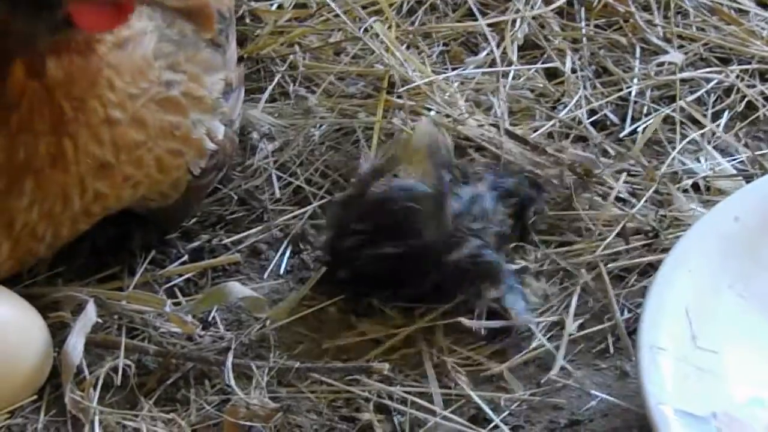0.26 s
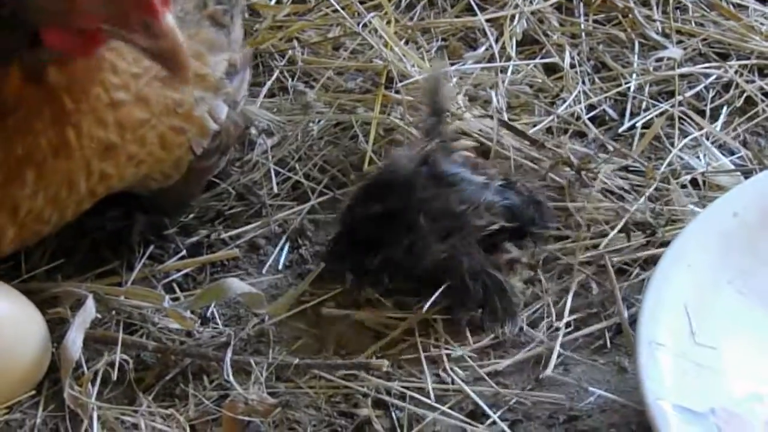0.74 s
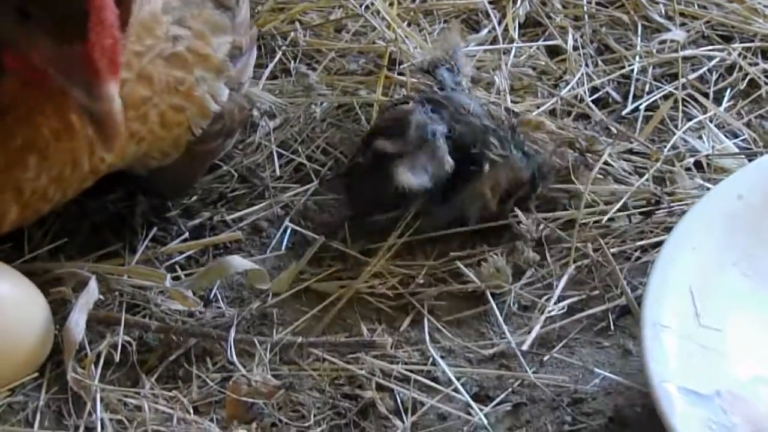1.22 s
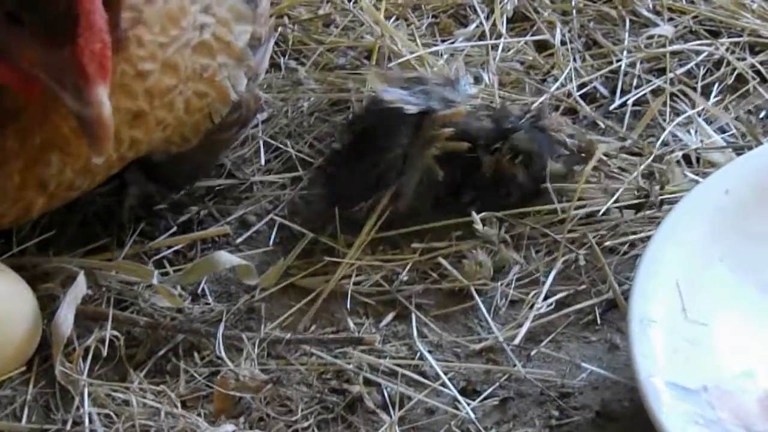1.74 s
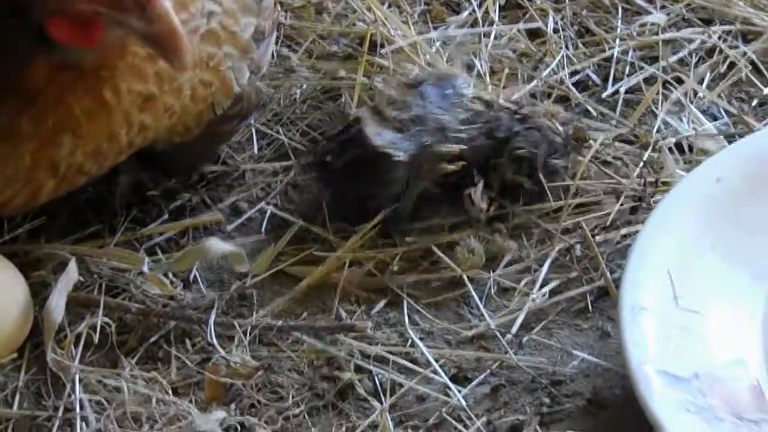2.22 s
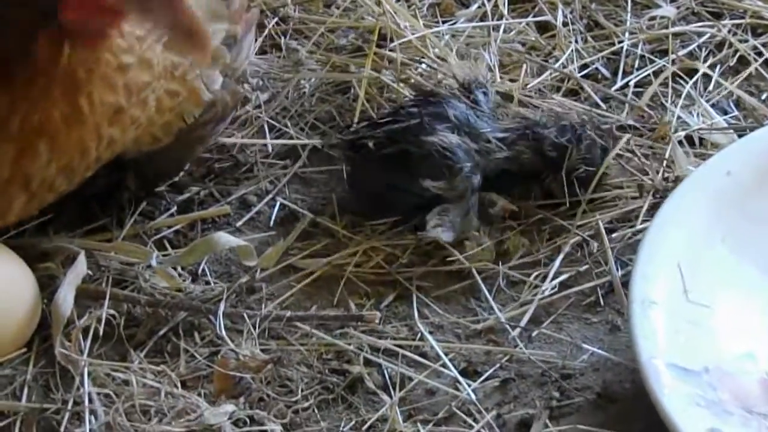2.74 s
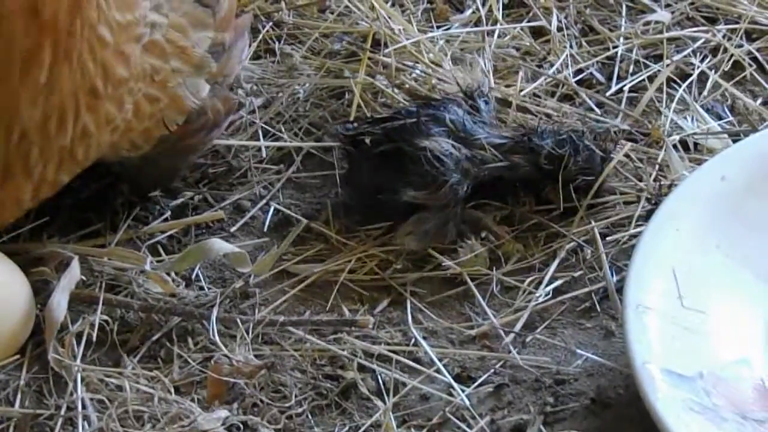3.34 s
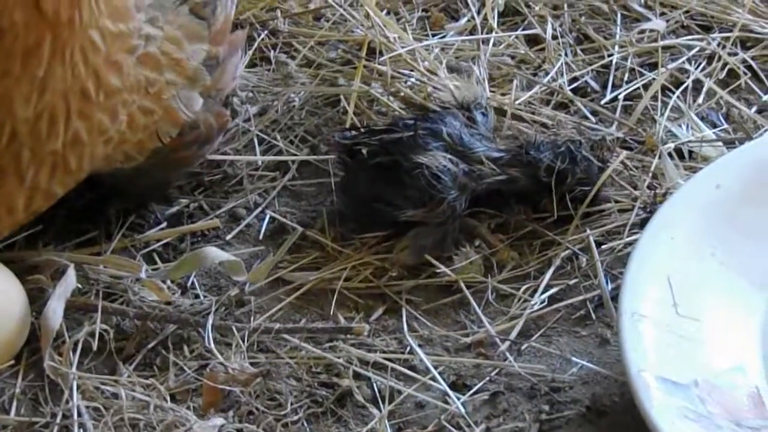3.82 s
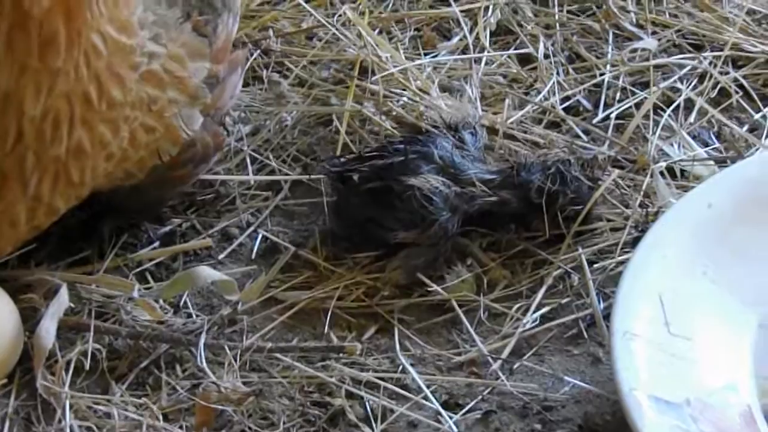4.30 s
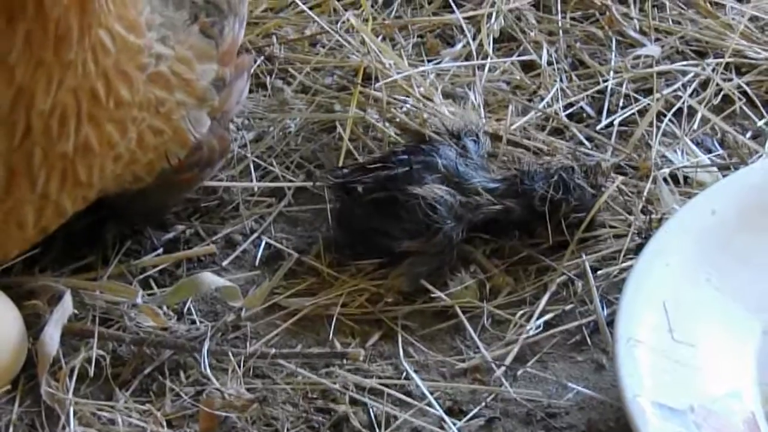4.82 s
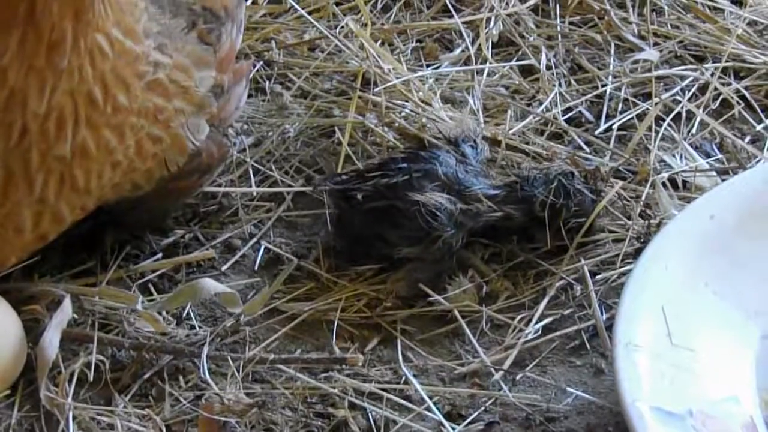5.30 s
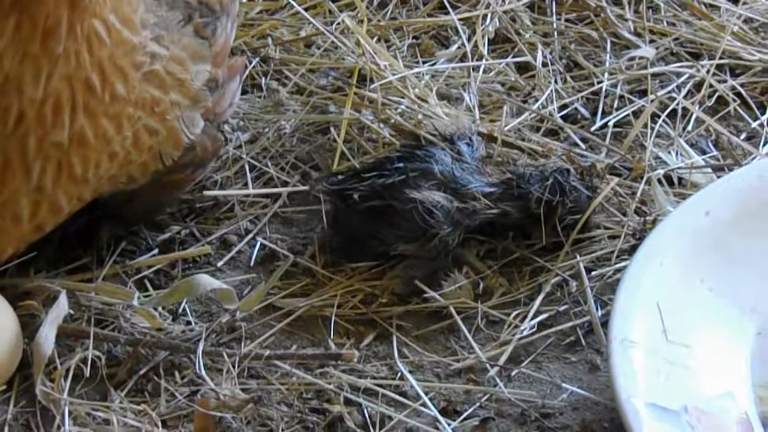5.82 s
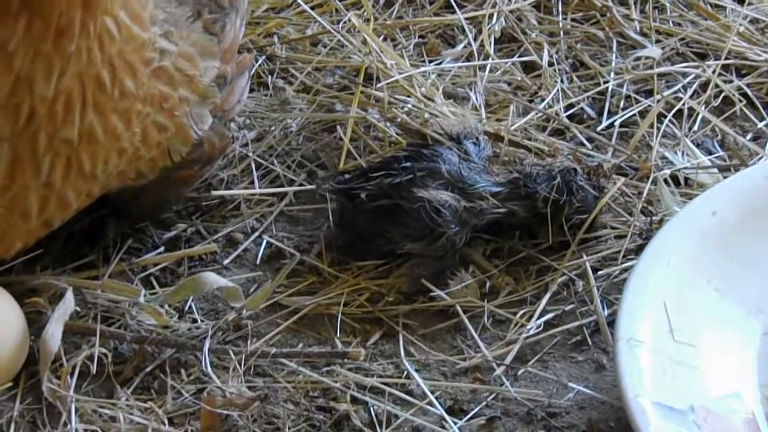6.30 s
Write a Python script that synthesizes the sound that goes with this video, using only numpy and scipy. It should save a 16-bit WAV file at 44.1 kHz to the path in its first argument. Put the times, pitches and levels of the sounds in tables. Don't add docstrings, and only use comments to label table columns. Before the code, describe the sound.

Loud, piercing chick peeps give way to gentler ones over low paired hen clucks, dry straw ticks and soft handling rumble.

```python
import sys
import numpy as np
from scipy import signal
from scipy.fft import rfft, irfft, next_fast_len
from scipy.io import wavfile
from scipy.ndimage import uniform_filter1d

SR = 44100
rng = np.random.default_rng(int(sys.argv[2]) if len(sys.argv) > 2 else 0)


def digitize_waveform(pressure):
    field = np.atleast_2d(pressure).T
    bounded = np.clip(field, -1, 1)
    quanta = np.round(bounded * 32767).astype(np.int16)
    wavfile.write(sys.argv[1], SR, quanta)


def volts_from_decibels(level):
    exponent = np.asarray(level, float) / 20
    return 10 ** exponent


N = 288855


def rms_one(x):
    return x / np.sqrt(np.mean(x ** 2) + 1e-20)


def resonate(x, hz, width_hz):
    r = np.exp(-np.pi * width_hz / SR)
    feedback = [1, -2 * r * np.cos(2 * np.pi * hz / SR), r * r]
    return signal.lfilter([(1 - r * r) / 2, 0, (r * r - 1) / 2], feedback, x)


def resonate_twice(x, hz, width_hz):
    return resonate(resonate(x, hz, width_hz), hz, width_hz)


def slow(size, hz):
    lowpass = signal.butter(2, hz, fs=SR, output="sos")
    return rms_one(signal.sosfilt(lowpass, rng.standard_normal(size + 4000))[4000:])


def coloured(noise, spectrum):
    hz, level_db = np.transpose(spectrum)
    colour = volts_from_decibels(np.interp(np.log(np.fft.rfftfreq(N, 1 / SR) + 1), np.log(hz), level_db))
    return rms_one(irfft(rfft(noise) * colour, N))


def gate(t, start_s, length_s, edge_s):
    return np.clip(np.minimum(t - start_s, start_s + length_s - t) / edge_s, 0, 1)


def add(out, s, sound):
    i = max(int(s * SR), 0)
    out[i:i + len(sound)] += sound[:N - i]


def rumble():
    # frequency in Hz, level in dB per Hz.
    shaking = [(8, -3.5), (18, 2.5), (40, 1), (62, -3.5), (80, -5), (100, -13), (150, -20), (260, -39.5)]
    # time in seconds, level in dB.
    grip = [
        (0, -41.5),
        (1.1, -37.5),
        (1.7, -42.5),
        (2.3, -39),
        (3.67, -40),
        (4.6, -41.5),
        (6.55, -39),
    ]
    t = np.arange(N) / SR
    lumpy = rng.standard_normal(N) * volts_from_decibels(1.0 * slow(N, 8.3))
    return volts_from_decibels(np.interp(t, *np.transpose(grip))) * coloured(lumpy, shaking)


def hiss():
    # frequency in Hz, level in dB per Hz.
    hiss_colour = [(150, -21), (276, -21), (500, -24), (965, -28), (2120, -29), (4000, -28), (4800, -23.5),
                   (5700, -29.5), (14100, -35), (15800, -49)]
    return volts_from_decibels(-47) * coloured(rng.standard_normal(N), hiss_colour)


def murmur():
    # crest in seconds, rise in seconds, fall in seconds, level in dB.
    swells = [
        (1.15, 0.26, .8, -51),
        (2.17, 0.14, .3, -59.5),
        (4.76, 0.29, .7, -46.5),
    ]
    foot_db = -18.5
    t = np.arange(N) / SR
    swell = 0
    for crest, rise, fall, db in swells:
        away = np.where(t < crest, (crest - t) / rise, (t - crest) / fall)
        swell = swell + volts_from_decibels(db + foot_db * away ** 2)
    far = rng.standard_normal(N) * volts_from_decibels(1.2 * slow(N, 10))
    drone = resonate(resonate(far, 375, 50), 375, 150)
    drone += .8 * resonate(resonate(far, 295, 50), 295, 150)
    drone += 0.37 * resonate(resonate(far, 250, 490), 340, 1200)
    return swell * rms_one(drone)


def straw():
    # start in seconds, peak level in dB, centre in Hz.
    ticks = [(.163, -29.5, 3700), (0.167, -28, 3680), (.168, -32, 1900), (.644, -33, 1800),
             (3.978, -33, 3800), (.167, -36, 5800), (0.642, -32, 3600), (0.565, -38, 1800),
             (2.24, -34, 4200), (2.501, -29, 3400), (2.501, -35.5, 4650), (2.98, -36, 9400),
             (3.267, -37, 9500), (3.298, -34, 10000), (3.412, -21, 8500), (3.412, -27, 1030),
             (3.412, -32, 4550), (3.65, -33, 5100), (3.65, -42, 7500), (4.729, -25.5, 970),
             (5.837, -31, 1010), (6.404, -35, 4800), (6.405, -40.5, 1490), (6.458, -33, 4740),
             (6.457, -32, 8500), (6.457, -31.5, 1230)]
    out, t = np.zeros(N), np.arange(400) / SR
    for s, peak_db, hz in ticks:
        burst = rng.standard_normal(400) * np.exp(-t / .001)
        snap = resonate_twice(burst, hz, .45 * hz)
        add(out, s, volts_from_decibels(peak_db) * snap / np.abs(snap).max())
    return out


def coop(x):
    # delay in seconds, level in dB.
    echoes = [(.021, -41), (.051, -42), (.071, -43.5), (.083, -53)]
    # delay in seconds, level in dB.
    boards = [(.0305, -38), (.0332, -31.5), (.0365, -37), (.040, -35.5), (.0445, -36)]
    t60_s, tail_db, dull_hz = 0.56, -35, 6300
    size = next_fast_len(N + SR)
    w = 2 * np.pi * np.arange(size // 2 + 1) / size * SR
    walls = sum(volts_from_decibels(db) * np.exp(-1j * w * lag) for lag, db in echoes)
    for k, lag in enumerate(rng.uniform(0.045, 0.095, 8)):
        loop = volts_from_decibels(-60 * lag / t60_s) * np.exp(-1j * w * lag)
        walls = walls + volts_from_decibels(tail_db) * (-1) ** k * loop / (1 - loop)
    for lag in (.0013, .0029, .0047):
        step = np.exp(-1j * w * lag)
        walls = walls * (step - .6) / (1 - .6 * step)
    walls = walls + sum(volts_from_decibels(db) * np.exp(-1j * w * lag) for lag, db in boards)
    walls = walls / (.75 + .25 * (w / (2 * np.pi * dull_hz)) ** 4)
    return irfft(rfft(x, size) * walls, size)[:N]


def cluck(length, start_hz, end_hz, level_db, overtone_db, envelope, glide, breath_db, flip=0):
    # frequency in Hz, gain in dB.
    throat = [(200, -2), (330, 11.5), (600, 5), (850, -6), (1050, -14.5), (1400, -5), (1900, -7.5),
              (2300, -32), (3000, -11.5), (3700, -17), (4500, -11)]
    chest_hz, chest_width_hz, chest_db = 795, 110, 10.5
    u = np.linspace(0, 1, int(length * SR))
    pitch = (start_hz + (end_hz - start_hz) * glide(u)) * (1 + .04 * slow(len(u), 200))
    pitch = uniform_filter1d(pitch, size=150, mode="nearest")
    phase = 2 * np.pi * (np.cumsum(pitch) / SR + rng.random())

    hz, throat_db = np.transpose(throat)
    flip_db = {1: -4, 2: 13}
    source = 0
    for k in range(1, 13):
        partial_db = np.interp(np.log(k * pitch), np.log(hz), throat_db)
        partial_db = partial_db + (k > 1) * (overtone_db - 1.5 * (k - 4.5))
        partial_db = partial_db + flip * glide(u) ** 2 * flip_db.get(k, 0)
        source = source + volts_from_decibels(partial_db) * np.sin(k * phase)

    puffs = np.maximum(np.cos(phase), 0) ** 2 * rng.standard_normal(len(u))
    breath = sum(volts_from_decibels(db) * resonate_twice(puffs, centre_hz, width_hz) for centre_hz, width_hz, db in
                 [(600, 800, 0), (1550, 900, -11), (3800, 1200, -9), (5800, 1500, -14)])
    source = source + volts_from_decibels(breath_db) * breath
    source = np.pad(envelope(u) * source * volts_from_decibels(2.0 * slow(len(u), 120)), (0, 1500))
    voiced = source + volts_from_decibels(chest_db) * resonate(source, chest_hz, chest_width_hz)
    return volts_from_decibels(level_db) * voiced / np.sqrt(np.max(uniform_filter1d(voiced ** 2, 200)))


def mutters():
    # start in seconds, length in seconds, pitch in Hz, level in dB, overtones in dB.
    low_mutters = [(0.1, 0.0087, 480, -47, -17), (0.314, .037, 553, -48, -21),
                   (0.656, 0.021, 468, -29, -13), (1.235, 0.0055, 460, -40.5, 5),
                   (1.275, 0.01, 384, -38, 0), (1.684, 0.0049, 590, -42, -25),
                   (1.717, 0.017, 674, -38.5, -15), (2.23, 0.025, 682, -41.5, -22),
                   (2.295, 0.011, 673, -34, -25), (2.324, 0.072, 574, -46, -22),
                   (2.724, 0.024, 630, -39, -8), (3.207, 0.027, 660, -36, -18), (3.413, 0.049, 750, -39, 7),
                   (3.762, 0.022, 630, -35, -19), (3.796, 0.083, 562, -47.5, 4),
                   (4.193, 0.036, 517, -44.5, 3), (4.416, 0.0074, 720, -48, -5),
                   (4.435, 0.025, 657, -34, -22), (5.122, 0.018, 730, -33, -14),
                   (6.006, 0.04, 566, -44, -21)]
    out = np.zeros(N)
    opening = lambda u: np.sin(np.pi * u ** 0.65)
    for s, length, hz, *voice in low_mutters:
        add(out, s, cluck(length, hz, 0.871 * hz, *voice, opening, lambda u: u, breath_db=14))
    return out


def warble():
    # time in seconds, pitch in Hz, level in dB, overtones in dB.
    path = [
        (5.808, 770, -30, 12),
        (5.812, 760, -16, 12),
        (5.819, 770, -15, 12),
        (5.824, 940, -2, -14),
        (5.831, 950, -2, -14),
        (5.835, 760, -9, 6),
        (5.839, 520, -7, 6),
        (5.843, 420, -30, 2),
    ]
    s, hz, db, overtone_db = np.transpose(path)
    length = s[-1] - s[0]
    along = lambda column: lambda u: np.interp(u, (s - s[0]) / length, column)
    out, u = np.zeros(N), np.linspace(0, 1, int(length * SR))
    add(out, s[0], cluck(length, 0, 1, -38.5, along(overtone_db)(u), along(volts_from_decibels(db)), along(hz), breath_db=0))
    return out


def coos():
    # start in seconds, length in seconds, end pitch in Hz, level in dB, overtones in dB.
    rising_coos = [
        (0.583, 0.0096, 770, -39.5, 6),
        (1.485, 0.048, 933, -30, -9.5),
        (1.796, 0.03, 888, -27.5, -16),
        (2.0755, 0.039, 850, -25, -20),
        (2.448, 0.038, 872, -25.5, -18),
    ]
    # start in seconds, length in seconds, end pitch in Hz, level in dB, overtones in dB.
    deep_coos = [
        (2.858, 0.036, 898, -26, -5),
        (3.927, 0.037, 840, -29.5, -5),
        (4.679, 0.0327, 796, -30, -4),
        (6.531, .03, 851, -36, -2),
    ]
    # start in seconds, length in seconds, end pitch in Hz, level in dB, overtones in dB.
    long_coo = [
        (1.041, 0.042, 884, -34.5, -2),
    ]
    coo_glide = [(0, 0.012), (.2, .34), (.66, .47), (.8, .9), (1, 0.86)]
    out = np.zeros(N)
    stepped = lambda u: np.interp(u, *np.transpose(coo_glide))
    held = lambda u: np.sin(np.pi * u ** 0.63) ** 0.81
    for s, length, hz, *voice in rising_coos:
        add(out, s, cluck(length, 350, hz, *voice, held, stepped, breath_db=6, flip=.6))
    for s, length, hz, *voice in deep_coos:
        add(out, s, cluck(length, 310, hz, *voice, held, stepped, breath_db=8, flip=1))

    sustained = lambda u: np.minimum(u / 0.03, 1) * (0.62 + 0.2 * np.exp(-u / 0.12))
    levelling = lambda u: np.minimum(u / 0.49, 1) ** 1.52
    for s, length, hz, *voice in long_coo:
        add(out, s, cluck(length, 500, hz, *voice, sustained, levelling, breath_db=-2))
    return out


def pops():
    # start in seconds, length in seconds, start pitch in Hz, level in dB, overtones in dB.
    falling_pops = [(0.159, 0.012, 686, -23.5, -3.5), (0.191, 0.0094, 670, -33, -2.5),
                    (0.631, 0.018, 730, -24, -3.5), (1.076, 0.025, 921, -26, -2.5),
                    (1.525, 0.02, 921, -24, -6), (1.835, 0.013, 785, -22.5, -7),
                    (2.12, 0.012, 765, -21.5, -9), (2.492, 0.012, 750, -21.5, -6),
                    (2.903, 0.0193, 570, -20, 1.5), (3.441, 0.011, 765, -27, 1),
                    (3.97, 0.013, 680, -26.5, -1.5), (4.722, 0.013, 512, -27.5, -0.5)]
    out = np.zeros(N)
    swelling = lambda u: np.sin(np.pi * u ** 1.05) ** 1.07
    falling = lambda u: np.minimum(u / 0.852, 1) ** 0.863
    for s, length, hz, *voice in falling_pops:
        add(out, s, cluck(length, hz, 432.4 - 0.183 * hz, *voice, swelling, falling, breath_db=5))
    return out


def hen():
    return mutters() + warble() + coos() + pops()


def peep(rows, round_s, halo_db, top_db=-24.0):
    # start in seconds, length in seconds, rasp in dB, drop of the whistle in dB.
    catches = [(0.325, 0.0051, -48, -1), (0.336, 0.0065, -43, 1.5), (0.38, 0.022, -45, -6.5),
               (0.7935, 0.003, -46, 0), (0.812, 0.024, -38, -5), (0.851, 0.008, -44, -1),
               (1.323, 0.0069, -32, -1.5), (1.3268, 0.002, -36, -16), (1.3298, 0.0059, -20, -7),
               (1.334, 0.005, -31, -14), (1.336, 0.014, -20.5, -4.5), (1.825, 0.0045, -48, -2),
               (1.84, 0.0018, -42, 0), (1.8435, 0.011, -29, -1), (1.8515, 0.0022, -31, -8),
               (1.854, 0.0027, -26.5, -5), (1.856, 0.0038, -28, -7), (1.874, 0.0015, -36, -1.5),
               (1.8305, .008, -60, 1.5), (1.892, .005, -60, 0), (1.899, 0.0057, -32, 1.5)]
    # start in seconds, length
    # in seconds, level in dB.
    slap_times = [
        (.8095, .003, -34),
        (.8355, .003, -35),
        (.851, 0.0065, -37),
        (1.229, .002, -41),
        (1.3205, .003, -34),
        (1.8585, .002, -31),
        (1.872, .002, -40),
    ]
    s, *columns = np.transpose(rows)
    t = np.arange(s[0], s[-1], 1 / SR)
    pitch, whistle_db, octave_db = [np.interp(t, s, c) for c in columns]
    pitch = uniform_filter1d(pitch, max(int(round_s * SR), 1), mode="nearest")
    rasp = np.zeros(len(t))
    for at, length, rasp_db, drop_db in catches:
        caught = gate(t, at, length, .0008)
        whistle_db = whistle_db + drop_db * caught
        rasp = rasp + volts_from_decibels(rasp_db) * caught
    strain = np.clip(rasp / volts_from_decibels(whistle_db + 5), 0, 1) ** 0.67

    phase = 2 * np.pi * np.cumsum(pitch * (1 + (.002 + .02 * strain) * slow(len(t), 300))) / SR
    tone = volts_from_decibels(whistle_db + (.25 + 2.5 * strain) * slow(len(t), 400)) * np.sin(phase)
    octave_shake_db = (.5 + 4.5 * strain) * slow(len(t), 200)
    tone += volts_from_decibels(octave_db + octave_shake_db - 17 * strain) * np.sin(2 * phase + 1)
    twelfth_db = whistle_db + .55 * (octave_db - whistle_db) + top_db
    twelfth_db -= 0.004 * np.maximum(3 * pitch - 10300, 0)
    rising = np.arange(len(t)) < np.argmax(pitch)
    twelfth_db -= 15 * rising + 25 * strain
    tone += volts_from_decibels(twelfth_db) * np.sin(3 * phase)
    tone += volts_from_decibels(2 * octave_db - 35) * np.sin(4 * phase)

    half = (.7 + .55 * slow(len(t), 400)) * np.sin(1.47 * phase)
    harsh = .4 * slow(len(t), 1700) * np.sin(1.45 * phase)
    harsh += .5 * slow(len(t), 1300) * np.sin(1.1 * phase)
    rasp_band = signal.butter(4, [3200, 8800], "band", fs=SR, output="sos")
    crack = signal.sosfilt(rasp_band, rasp * (half + harsh))
    slaps = sum(volts_from_decibels(db) * gate(t, at, length, .0006) for at, length, db in slap_times)
    crack += slaps * slow(len(t), 1300) * np.sin(1.1 * phase)

    halo = volts_from_decibels(whistle_db + halo_db) * slow(len(t), 550) * np.sin(.85 * phase)
    halo *= (pitch / pitch.max()) ** 12
    fade = np.clip(np.minimum(t - s[0], s[-1] - t) / 0.0016, 0, 1)
    return np.sqrt(2) * fade * (tone + crack + halo)


def arch(u, top_at, start, end):
    climb = np.sin(np.pi / 2 * np.minimum(u / top_at, 1) ** 1.026)
    late = np.clip((u - top_at) / (1 - top_at), 0, 1)
    sag = 0.3
    return start + (1 - start) * climb - (1 - end) * (sag * late + (1 - sag) * late ** 3.1)


def chirp(s, length, start_hz, top_hz, level_db):
    u = np.linspace(0, 1, 30)
    db = level_db - (2 * u - 1) ** 2
    return np.transpose([s + u * length, top_hz * arch(u, 0.58, start_hz / top_hz, .87), db, db - 31])


def far_chicks():
    # start in seconds, length in seconds, start pitch in Hz, top pitch in Hz, level in dB.
    chirps = [(1.549, 0.034, 3220, 3650, -50), (2.11, 0.027, 3190, 3590, -44),
              (3.177, 0.027, 2580, 3720, -50), (3.9, 0.044, 3600, 4250, -49),
              (3.951, .016, 3450, 3600, -50), (4.031, 0.052, 3650, 4380, -47.5),
              (4.053, 0.041, 3130, 3650, -46.5), (5.176, .035, 3500, 3900, -54),
              (5.239, 0.031, 3050, 3950, -45), (6.244, 0.038, 2170, 3410, -51),
              (6.312, 0.051, 3640, 3980, -49)]
    # start in seconds, length in seconds, start pitch in Hz, top pitch in Hz, level in dB.
    traces = [
        (4.533, 0.026, 1820, 1890, -52),
        (4.766, .04, 2300, 2340, -54),
        (5.014, .03, 1850, 2010, -51.5),
        (5.39, .03, 1750, 1850, -57),
    ]
    # time in seconds, pitch in Hz, level in dB.
    fading = [
        (0, 4220, -41),
        (.01, 4050, -48),
        (.02, 3770, -44),
        (.03, 3400, -47),
        (.045, 3270, -54),
    ]
    out = np.zeros(N)
    for row in chirps:
        far = peep(chirp(*row), round_s=.002, halo_db=-25)
        add(out, row[0], far * volts_from_decibels(1.8 * slow(len(far), 90)))
    for row in traces:
        blurred = peep(chirp(*row), round_s=.002, halo_db=-20)
        add(out, row[0], blurred * (.8 + .6 * slow(len(blurred), 120)))
    scattered = peep([(s, hz, db, -90) for s, hz, db in fading], round_s=.003, halo_db=-20)
    add(out, 0, scattered * slow(len(scattered), 250))
    return out


def calm_peeps():
    # time in seconds, pitch in Hz, whistle level in dB.
    calm = [
        [(2.695, 3140, -38), (2.705, 3210, -29.5), (2.745, 3620, -27.5), (2.761, 3570, -27.5),
         (2.771, 3350, -27), (2.777, 2840, -32.5), (2.781, 2850, -58)],
        [(3.775, 3300, -39), (3.783, 3600, -29), (3.797, 3772, -29.5), (3.823, 4140, -31.5), (3.831, 4100, -30),
         (3.853, 3947, -30.5), (3.861, 3590, -25.5), (3.867, 2930, -31.5), (3.871, 2820, -49)],
        [(4.156, 2320, -44), (4.16, 2330, -38), (4.168, 2970, -30.5), (4.174, 3210, -23), (4.194, 3804, -28.5),
         (4.206, 3970, -29), (4.216, 3920, -29.5), (4.228, 3520, -26), (4.238, 2790, -33)],
        [(4.508, 2920, -38), (4.516, 3170, -30.5), (4.536, 3517, -26.5), (4.55, 3910, -32.5),
         (4.568, 3950, -27.5), (4.586, 3848, -32), (4.594, 3557, -26.5), (4.604, 2870, -34.5)],
        [(4.979, 2460, -47), (4.988, 3005, -28.5), (4.996, 3224, -25.5), (5.01, 3340, -24.5),
         (5.026, 4000, -27.5), (5.05, 4054, -27.5), (5.062, 3930, -28), (5.07, 3488, -27), (5.08, 2750, -40)],
        [(5.37, 3100, -32.5), (5.38, 3430, -29), (5.398, 3616, -26.5), (5.426, 3980, -29), (5.446, 3860, -26.5),
         (5.458, 3710, -26.5), (5.466, 3363, -24), (5.472, 2960, -30), (5.479, 2330, -49)],
    ]
    # time in seconds, pitch in Hz, whistle level in dB.
    weak = [
        [(3.052, 3400, -54), (3.06, 3560, -34.5), (3.076, 3610, -34.5), (3.098, 4000, -37.5),
         (3.12, 4160, -36.5), (3.132, 3906, -33), (3.14, 3380, -34), (3.149, 2880, -43)],
        [(3.404, 3030, -45), (3.42, 3265, -36), (3.438, 3890, -39.5), (3.456, 4070, -40), (3.466, 3960, -38),
         (3.476, 3633, -34), (3.486, 2860, -41), (3.49, 2891, -63)],
        [(3.626, 2980, -53), (3.632, 3080, -42.5), (3.644, 3490, -36.5), (3.658, 4264, -42), (3.668, 4400, -44),
         (3.676, 4215, -45), (3.684, 3667, -52), (3.693, 3730, -60)],
    ]
    # octave change in dB, haze in dB.
    peep_colour = [(-10, -25), (-6, -15), (0, -15), (-6, -16), (-7, -15), (1, -21), (-5, -18), (-8, -20),
                   (-8, -22)]
    out = np.zeros(N)
    for rows, (octave_db, breath_db) in zip(calm + weak, peep_colour):
        voice = [(s, hz, db, db + octave_db - 31.5 - 0.004 * (hz - 4000)) for s, hz, db in rows]
        add(out, rows[0][0], peep(voice, round_s=.005, halo_db=breath_db))
    return out


ONSET_S, ONSET_HZ, ONSET_DB = 0.0059, -220, -40


def strained(rows, rising_db, falling_db):
    # time in seconds, jump in Hz, octave gain in dB.
    breaks = [(0.793, -90, 0.3), (.8105, -110, 0.5), (0.836, -370, -4.5), (0.857, -180, 5.5),
              (1.349, -220, -0.5), (1.365, 3, -9.5), (1.37, 0, 10), (1.376, -200, 0.5), (1.386, 301.5, 10),
              (1.399, -9, -0.5), (1.267, -1, -10.5), (1.276, -1, 8.5), (1.828, 51, -6.5), (1.84, -1, -4),
              (1.859, -100, 12.5), (1.874, -250, -4), (1.898, 348, 12.5)]
    # pitch in Hz, level in dB.
    windpipe = [(2250, 16), (2750, 1), (3050, -7.5), (3300, -24.5), (3520, -23), (3750, -32), (4000, -25),
                (4250, -27)]
    onset = np.add(rows[0], (-ONSET_S, ONSET_HZ, ONSET_DB))
    close = np.add(rows[-1], (0.005, -280, -13))
    s, hz, db = np.transpose([onset, *rows, close])
    step_s = .0005
    t = np.arange(s[0], s[-1], step_s)
    pitch, whistle_db = np.interp(t, s, hz), np.interp(t, s, db)
    turn_s = 0.0066
    pitch = uniform_filter1d(pitch, max(int(turn_s / step_s), 1), mode="nearest")
    flips = [(np.clip((t - at) / .002 + .5, 0, 1), jump, gain_db)
             for at, jump, gain_db in breaks if at > s[0]]
    pitch += sum(flip * jump for flip, jump, gain_db in flips)
    press_db = np.where(np.arange(len(t)) < np.argmax(pitch), rising_db, falling_db)
    octave_db = whistle_db + np.interp(pitch, *np.transpose(windpipe))
    octave_db += uniform_filter1d(1. * press_db, size=20)
    octave_db += sum(flip * gain_db for flip, jump, gain_db in flips)
    return np.transpose([t, pitch, whistle_db, np.minimum(octave_db, -9.5)])


def strained_peeps():
    # time in seconds, pitch in Hz, whistle level in dB.
    whole = [
        [(.286, 3640, -30.5), (.314, 4154, -24), (.351, 4310, -23), (.371, 4200, -22.5), (.394, 3470, -15),
         (.399, 3180, -18.5), (.405, 2850, -37.5)],
        [(2.242, 2980, -31.5), (2.256, 3240, -21), (2.309, 3666, -18), (2.34, 4130, -17), (2.359, 4180, -16),
         (2.374, 3960, -14.5), (2.383, 3410, -12.5), (2.389, 2800, -26.5), (2.393, 2422, -36)],
    ]
    # time in seconds, pitch in Hz, whistle level in dB.
    cracking = [
        [(.684, 3573, -28), (.748, 3990, -18), (.793, 4160, -15.5), (.809, 4370, -15), (.822, 4510, -16),
         (.834, 4556, -15), (.858, 4250, -13.5), (.883, 3800, -18.5), (.899, 3100, -40.5)],
        [(1.231, 3360, -24), (1.25, 3440, -14.5), (1.286, 3990, -11), (1.325, 4296, -12.5), (1.334, 4054, -6),
         (1.373, 3464, -9), (1.378, 3420, -17), (1.388, 3173, -13.5), (1.403, 2600, -34.5)],
        [(1.752, 3260, -26), (1.778, 3550, -17), (1.84, 3920, -14.5), (1.858, 4140, -14), (1.872, 4050, -13.5),
         (1.887, 3870, -10.5), (1.899, 3580, -13.5), (1.912, 3090, -16), (1.9235, 2396, -35)],
    ]
    # octave while rising in dB, octave while falling in dB, twelfth in dB.
    pressed = [(-2, 1, -27), (-9, -10, -24), (-11, -0.5, -27), (2.5, 6.5, -22.5), (10, -1.5, -24.5)]
    out = np.zeros(N)
    for rows, (*press, twelfth_db) in zip(whole + cracking, pressed):
        voice = strained(rows, *press)
        add(out, rows[0][0] - ONSET_S, peep(voice, round_s=0.0011, halo_db=-69, top_db=twelfth_db))
    return out


def scene():
    background = rumble() + murmur() + hiss()
    clucks = hen()
    peeps = far_chicks() + calm_peeps() + strained_peeps()
    echoes = coop(peeps + volts_from_decibels(5.5) * clucks)
    return (background + straw() + echoes + clucks + peeps)[None]


def roll_off(x):
    return signal.sosfilt(signal.butter(12, 16400, fs=SR, output="sos"), x)


def record(dry):
    top_cut = signal.cheby2(14, 70, 16350, fs=SR, output="sos")
    mix = signal.sosfilt(top_cut, dry) - .0039
    return roll_off(mix)


dry = scene()
out = record(dry)
digitize_waveform(out)
```